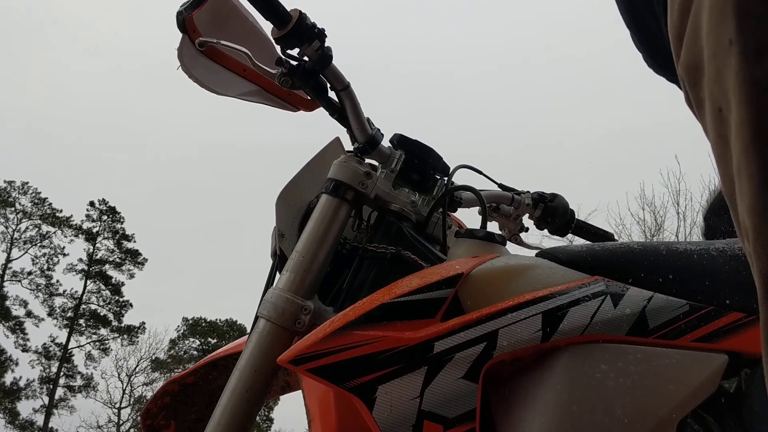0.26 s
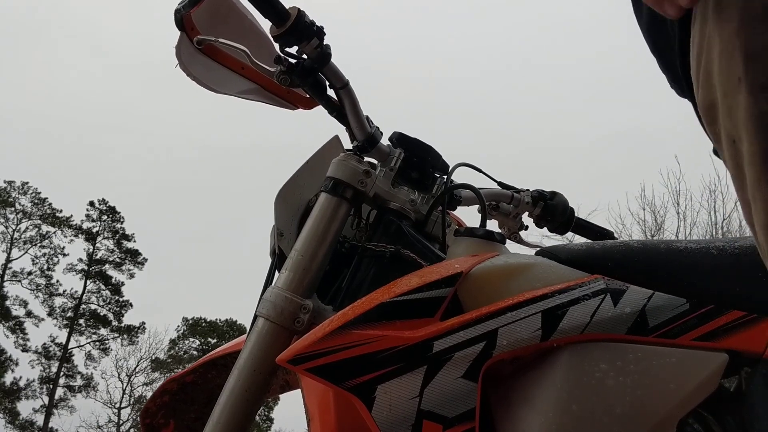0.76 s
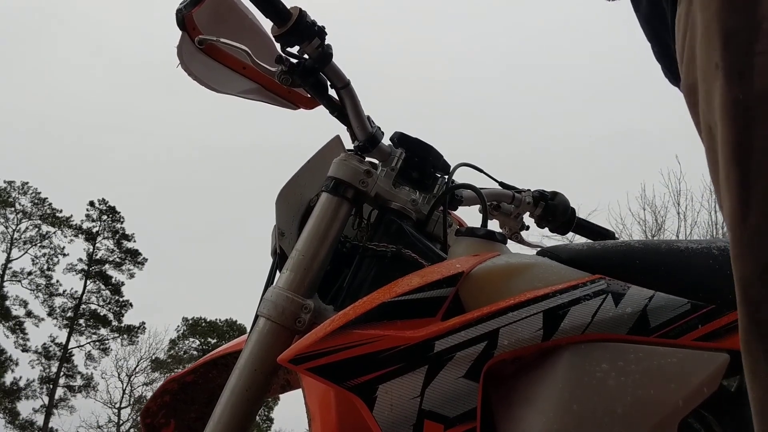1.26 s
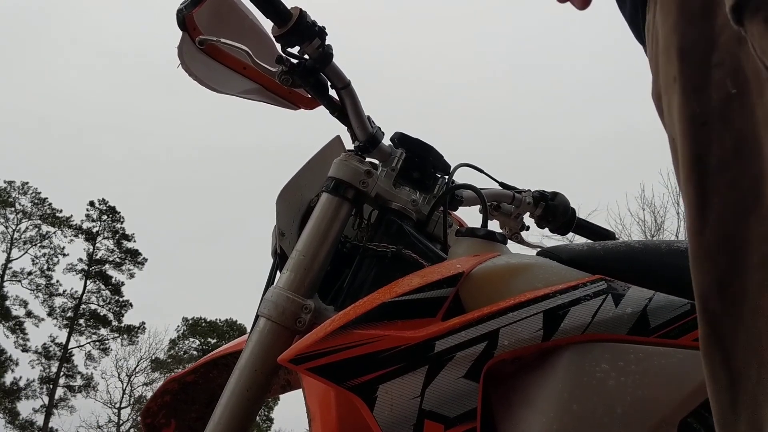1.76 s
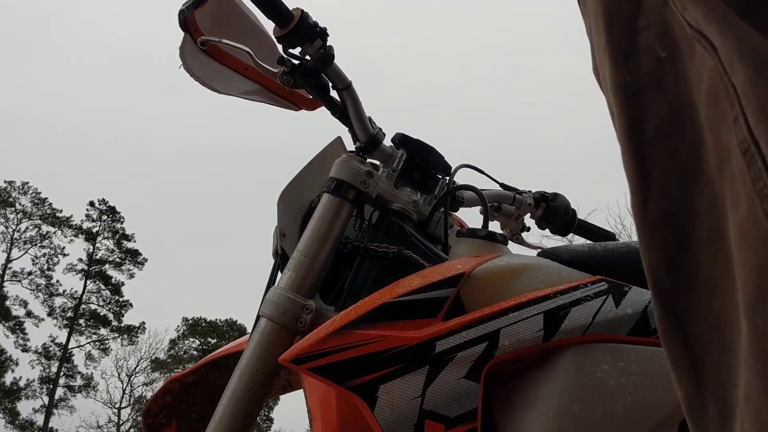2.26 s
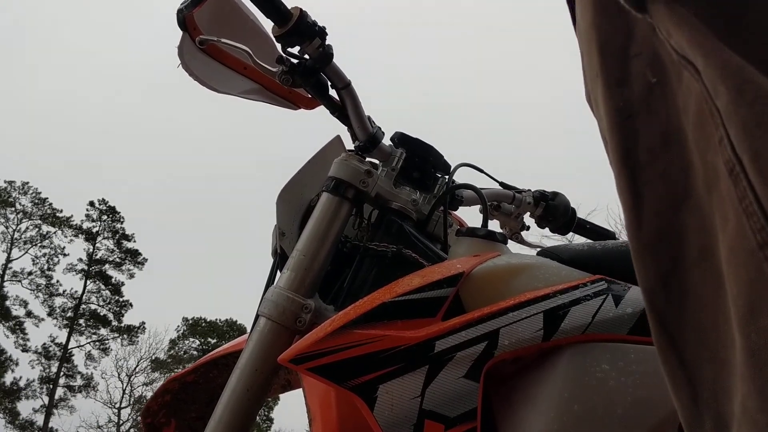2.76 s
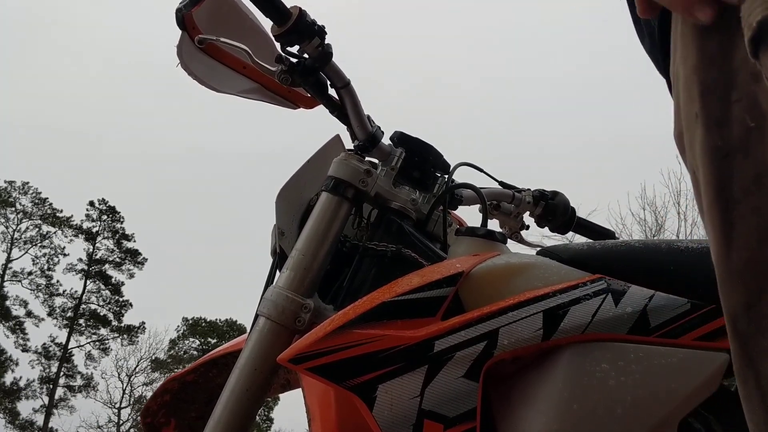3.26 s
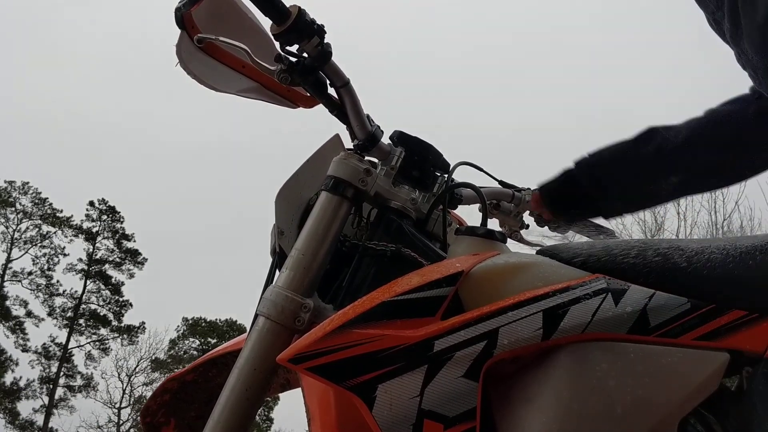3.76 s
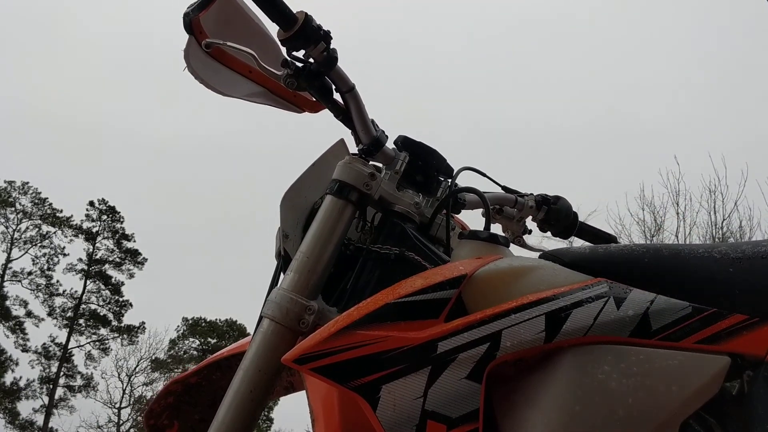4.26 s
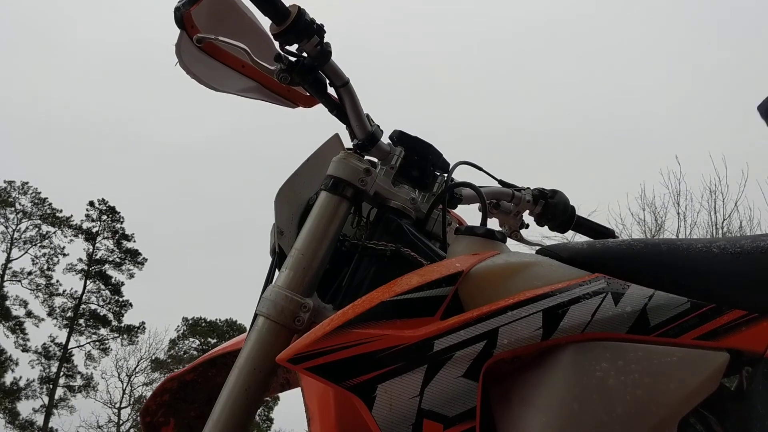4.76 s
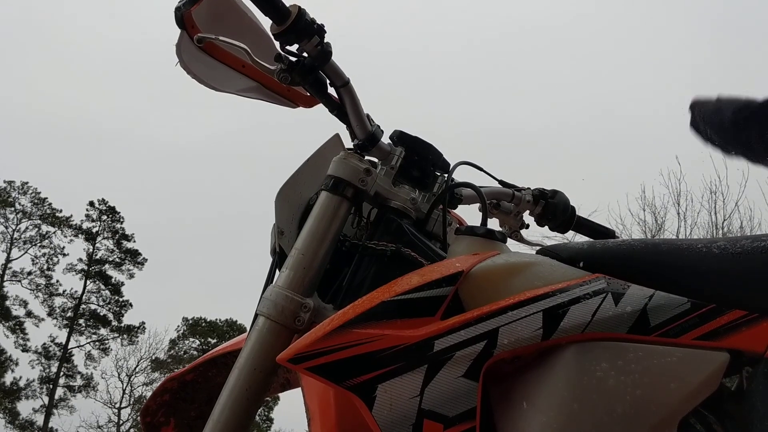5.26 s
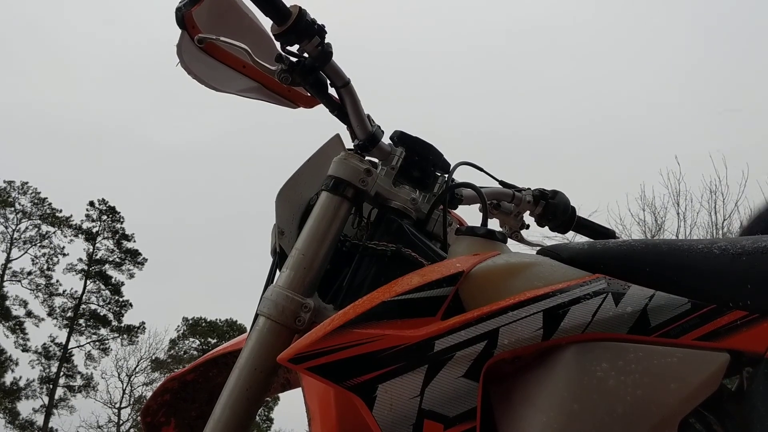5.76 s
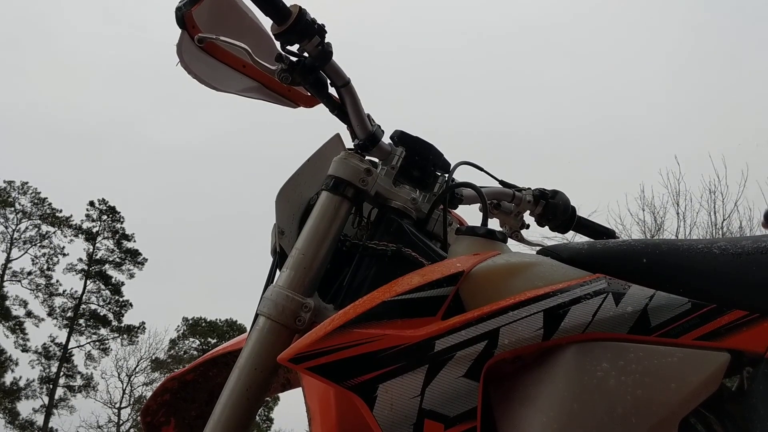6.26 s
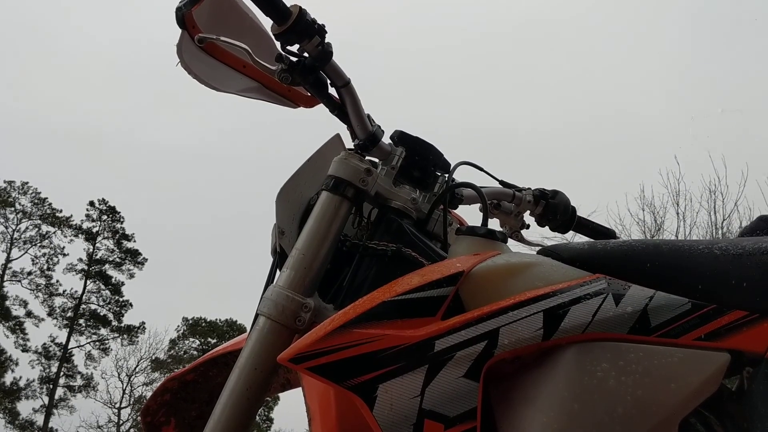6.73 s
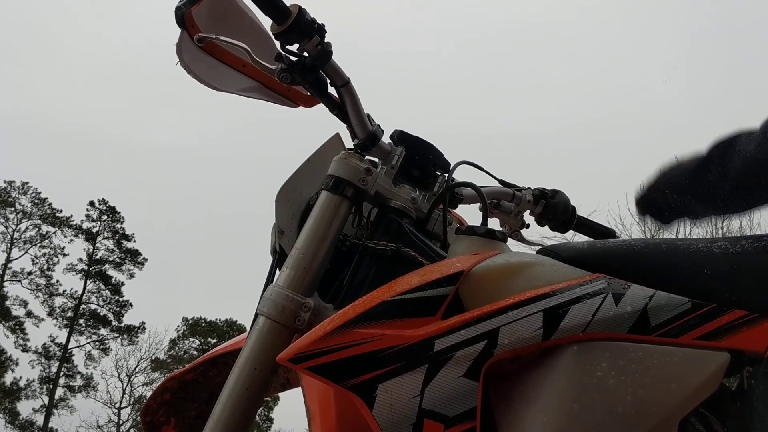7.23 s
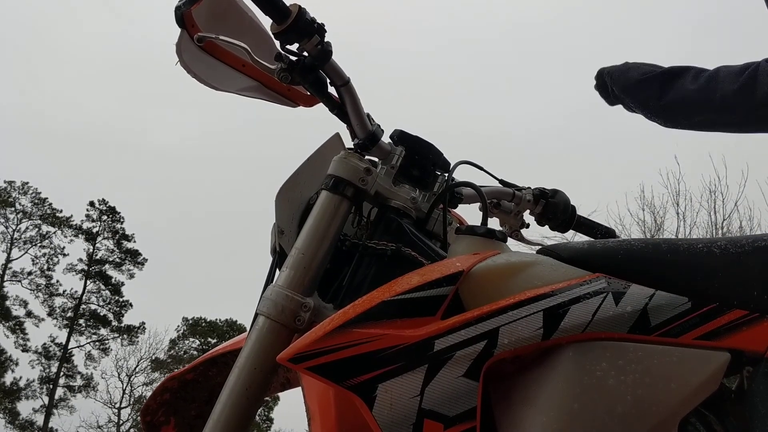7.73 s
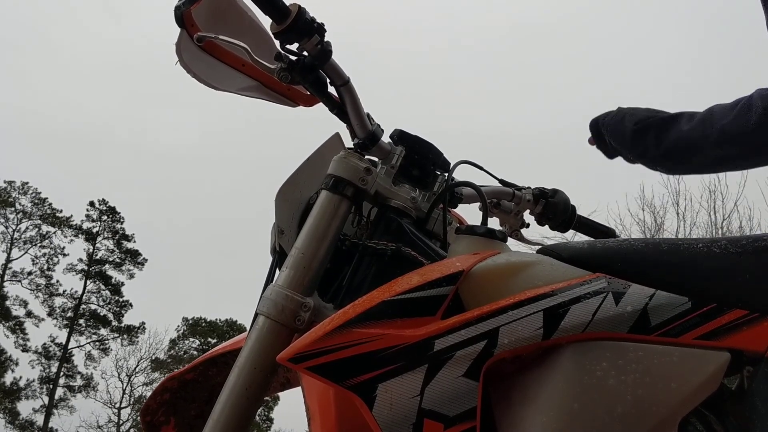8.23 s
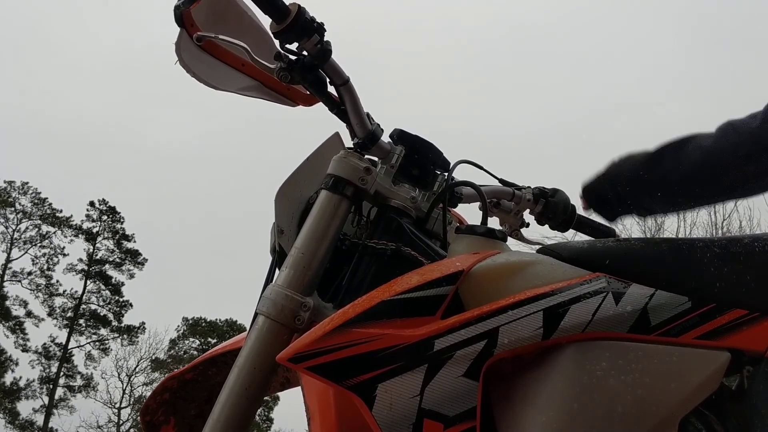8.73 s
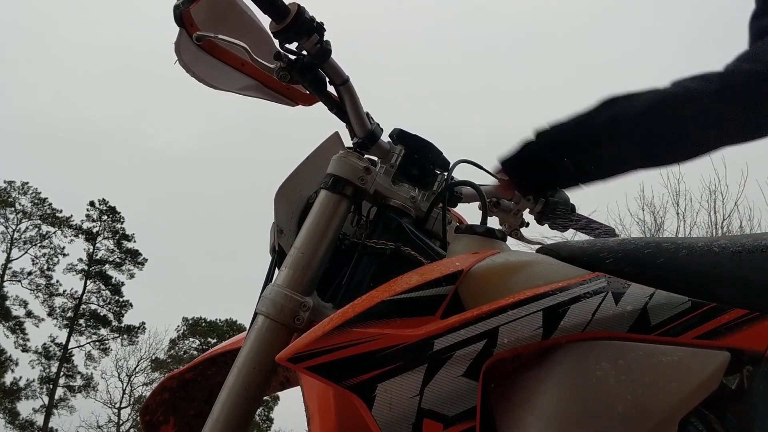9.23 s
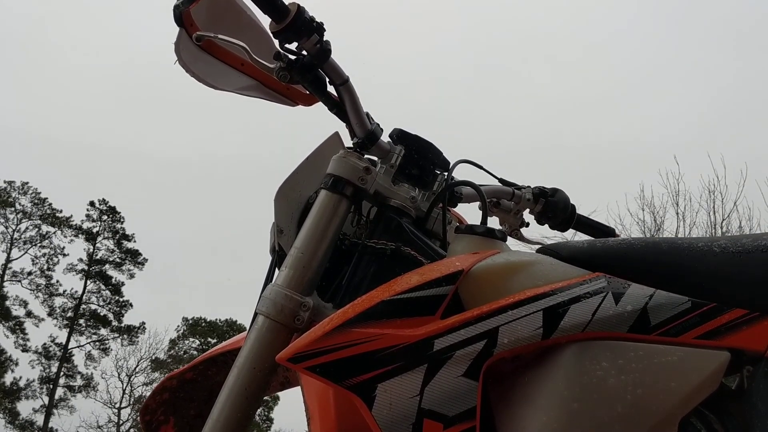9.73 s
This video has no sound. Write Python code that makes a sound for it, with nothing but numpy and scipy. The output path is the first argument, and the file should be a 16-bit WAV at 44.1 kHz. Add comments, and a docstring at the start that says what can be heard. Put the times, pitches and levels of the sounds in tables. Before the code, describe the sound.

Close outdoors, a two-stroke dirt bike cranks slowly without catching. Dry, hollow chugs come about four a second, each a crack and bark over a low boom with a breathy puff. After three and a half seconds it falters into hissing spits and a pause, then chugs resume harder and brighter. Near nine seconds it fails again, sputtering weakly. Faint yard echo, quiet air.

```python
"""Two-stroke dirt bike turning over slowly outdoors

Each chug dumps the cylinder into the exhaust: noise blasts give a crack and a bark, swinging tones a low boom
and a drone, slower noise a trailing puff. Twice the chugging falters and gas spits out in sputtering hisses.
Whistles and ticks come from the engine, and dull low bumps fall between the chugs; the yard gives a faint echo."""
import sys
import numpy as np
from scipy import signal
from scipy.io import wavfile
from scipy.ndimage import uniform_filter1d

SR = 44100
rng = np.random.default_rng(int(sys.argv[2]) if len(sys.argv) > 2 else 0)


def digitize_waveform(pressure):
    """Quantize a signal to 16-bit integers and store it at the path in sys.argv[1].

    Rows of a 2-D input are taken as channels; values are limited to [-1, 1].
    """
    field = np.atleast_2d(pressure).T
    bounded = np.clip(field, -1, 1)
    quanta = np.round(bounded * 32767).astype(np.int16)
    wavfile.write(sys.argv[1], SR, quanta)


N = 440559

# exhaust resonances, lift scaled by each user's depth: centre_hz, width_hz, lift_db
PIPE_MODES = [(172, 130, 5), (272, 52, 2), (315, 26, 2.5), (356, 27, 0), (449, 21.4, 6.5), (589, 52, 3.5),
              (871, 20, 4.5), (950, 18, 1), (1151, 124, 3), (1480, 66, 0.5), (2086, 160, 5), (2680, 54, 1),
              (3060, 220, 3.5), (3600, 81, 3), (3930, 43, -1), (4770, 61, 2.5), (5030, 390, 4)]
# spectrum of the blowdown's sharp edge: freq_hz, relative_density_db
CRACK_SPECTRUM = [(500, -12), (1200, -7.5), (2000, -12.5), (3200, -15.5), (4700, -16.5), (5700, -16),
                  (6900, -7.5), (7600, -8), (8600, -22.5), (10000, -34), (12000, -49.5), (15000, -43)]


def amp(db):
    """Decibels to gain."""
    return 10 ** (np.asarray(db) / 20)


def evened(x):
    """Scales to rms 1."""
    return x / np.sqrt(np.mean(x ** 2) + 1e-20)


def read(points, hz):
    """Reads a spectrum on a log-frequency axis."""
    point_hz, value = np.transpose(points)
    return np.interp(np.log(hz + 1), np.log(point_hz + 1), value)


def add(mix, start_s, sound):
    """Mixes a sound in at start_s."""
    part = mix[max(round(start_s * SR), 0):][:len(sound)]
    part += sound[:len(part)]


def ring(points, modes=(), depth=1, size=4096):
    """Minimum-phase impulse response of a spectrum with resonances raised on it; energy 1."""
    hz = abs(np.fft.fftfreq(size, 1 / SR))
    lifts = sum(lift_db / (1 + (2 * (hz - f) / width_hz) ** 2) for f, width_hz, lift_db in modes)
    log_gain = np.log(amp(read(points, hz) + depth * lifts))
    response = np.fft.ifft(np.exp(np.conj(signal.hilbert(log_gain)))).real
    return response / np.linalg.norm(response)


def through(x, response):
    """Filters x, keeping its length."""
    return signal.fftconvolve(x, response)[:len(x)]


def wobble(count, rate_hz):
    """Random curve: unit-variance Gaussian knots, rate_hz of them a second, joined by lines."""
    at = np.arange(count) * rate_hz / SR
    knots = rng.standard_normal(int(at[-1]) + 2)
    return np.interp(at, np.arange(len(knots)), knots)


def levelled(x, db, start_s, end_s):
    """Gives x the rms level db between two times."""
    window = x[int(start_s * SR):int(end_s * SR)]
    return x * amp(db) / np.sqrt(np.mean(window ** 2) + 1e-20)


def resonate(x, hz, width_hz):
    """A two-pole resonance, as the imaginary part of one complex pole."""
    r = np.exp(-np.pi * abs(width_hz) / SR)
    return signal.lfilter([1 - r], [1, -r * np.exp(2j * np.pi * hz / SR)], x).imag


def chugs():
    """Each blowdown swings the gas in the exhaust and rings its resonances."""
    # charge: gas swing in the pipe; force: how hard the port opens: start_s, charge_db, force_db
    chug_rows = [(0.1187, 1, 2), (0.3587, 1.5, -0.5), (0.6193, -1.5, -5.5), (0.9174, -1.5, -1.5),
                 (1.2252, 2.5, -3.5), (1.484, 0.5, -4), (1.7436, -0.5, -5.5), (1.9952, -1, -5.5),
                 (2.2649, -2.5, -5.5), (2.5313, -1.5, -4), (2.8317, -2, -2), (3.083, -1.5, -6),
                 (3.3466, 1.5, -3.5), (3.671, -19, -15), (3.996, -10, -3), (4.893, 4.5, 1),
                 (5.1394, 0.5, 4), (5.3722, -0.5, 4.5), (5.602, 0.5, 2.5), (5.8412, 1, 2), (6.0835, -2, 3),
                 (6.3209, 0, 2), (6.5649, -2.5, 2.5), (6.799, 0.5, 3), (7.0505, 2, 3), (7.3205, 1, 3.5),
                 (7.604, -0.5, 4), (7.894, -3, 0), (8.149, -3.5, 1.5), (8.355, -2.5, 1),
                 (8.5614, -7.5, 3.5), (8.824, -5, 3.5), (9.242, -12.5, -9), (9.552, -19, -8),
                 (9.966, -10, -11.5)]
    # levels at 0 dB charge and force
    boom_db, drone_db, puff_db, bark_db, crack_db = -30.5, -36, -35.5, -29.5, -31
    # dB per dB of charge (drone, puff) or force (crack: a hard opening is also brighter)
    drone_follow, puff_follow, crack_follow = 0.59, 1, 1.1
    head_s, middle_s, tail_s = .02, .04, .06
    out, t = np.zeros(N), np.arange(SR // 4) / SR
    for start_s, charge_db, force_db in chug_rows:
        chug = levelled(boom(t, force_db), boom_db + charge_db, 0, middle_s)
        chug += levelled(drone(t), drone_db + drone_follow * charge_db, 0, middle_s)
        chug += levelled(bark(t), bark_db + force_db, 0, head_s)
        chug += levelled(crack(t, force_db), crack_db + crack_follow * force_db, 0, head_s)
        chug += levelled(puff(t), puff_db + puff_follow * charge_db, head_s, tail_s)
        add(out, start_s, chug)
    return out


def blast(t, hold_s, decay_s, shock, ragged_db):
    """A pressure step as the port opens, then ragged turbulence that holds briefly and dies."""
    gas = rng.standard_normal(len(t)) * amp(ragged_db * wobble(len(t), 708))
    gas *= np.exp(-np.maximum(t - hold_s, 0) / decay_s)
    gas[0] -= shock
    return gas


def bark(t, round_trip_s=.0083, return_db=-1):
    """The pressure wave runs down the chamber and comes back as a second blow."""
    # relative spectrum: freq_hz, density_db
    bark_spectrum = [(100, -44.5), (220, -25), (320, -8.5), (450, -2.5), (620, 1.5), (850, -5.5),
                     (1200, -7), (1700, -12), (2600, -14), (5000, -53.5)]
    blows = blast(t, hold_s=0.0048, decay_s=0.0031, shock=3.6, ragged_db=3.5)
    second = blast(t, hold_s=0.0016, decay_s=0.0094, shock=12.2, ragged_db=4.5)
    add(blows, round_trip_s, amp(return_db) * second)
    return through(blows, ring(bark_spectrum, PIPE_MODES, depth=1.42))


def crack(t, force_db, sizzle_db=-23):
    """The blowdown's sharp edge, shorter the harder it comes, over a faint longer sizzle."""
    hold_s, decay_s, halving_db = 0.0027, 0.0069, 14  # times at 0 dB force; halved per halving_db
    stretch = 2 ** (-force_db / halving_db)
    sizzle = amp(sizzle_db) * blast(t, hold_s=0.0086, decay_s=0.049, shock=0, ragged_db=5.5)
    edge = blast(t, hold_s * stretch, decay_s * stretch, shock=6.5, ragged_db=3)
    chance_modes = lumps(low_hz=1190, high_hz=7490, lift_db=5, width_hz=440)
    return through(sizzle + edge, ring(CRACK_SPECTRUM, [*PIPE_MODES, *chance_modes]))


def lumps(low_hz, high_hz, lift_db, width_hz, count=12):
    """Chance resonances and dips, up to lift_db: no two cracks have quite the same colour."""
    draws = rng.uniform((low_hz, -1), (high_hz, 1), (count, 2))
    return [(hz, width_hz, lift_db * share) for hz, share in draws]


def boom(t, force_db, unsteady=0.31, detune=.035):
    """The gas in the pipe swings briefly, higher after a hard opening, then rings on unsteadily."""
    base_hz, hz_per_db = 79.5, .5
    peak_s, width_s, ring_decay_s = 0.014, 0.015, 0.054
    hz = (base_hz + hz_per_db * force_db) * rng.normal(1, detune)
    swell = np.exp(-((t - peak_s) / width_s) ** 2)
    swell += unsteady * np.exp(-t / ring_decay_s) * wobble(len(t), 65.2)
    return swell * np.sin(2 * np.pi * hz * t - .4)


def drone(t, attack_s=0.0074, detune=.024):
    """The higher gas swings, hollow decaying tones, never tuned quite the same."""
    # pitch_hz, relative_level_db, t60_s
    overtones = [(125.5, -0.5, 0.26), (165.5, 0.5, 0.17), (192.3, 0.5, 0.22), (249.5, -1.5, .18),
                 (310.5, -5.5, 0.14)]
    tones = np.zeros(len(t))
    for hz, db, t60_s in overtones:
        cycles = hz * rng.normal(1, detune) * t + rng.random()
        tones += amp(db - 60 * t / t60_s) * np.sin(2 * np.pi * cycles)
    return np.minimum(t / attack_s, 1) * tones


def puff(t, attack_s=.023, hold_s=0.028, decay_s=0.024, ragged_db=4.0):
    """The rest of the charge follows while the port stands open."""
    # relative spectrum: freq_hz, density_db
    puff_spectrum = [(120, -34.5), (250, -6.5), (350, -10), (600, -10), (1100, -11.5), (2000, -21),
                     (3200, -29), (5500, -31.5), (6900, -21.5), (7500, -22), (8600, -36), (10500, -49.5),
                     (12500, -56), (15000, -52)]
    flow = np.minimum(t / attack_s, 1) ** 2 * np.exp(-np.maximum(t - hold_s, 0) / decay_s)
    gas = flow * rng.standard_normal(len(t)) * amp(ragged_db * wobble(len(t), 299.6))
    return through(gas, ring(puff_spectrum, PIPE_MODES, depth=0.69))


def spits():
    """Gas squeezed out under compression: a broad rush with a sharp hiss on top."""
    # start_s, length_s, shut_s, rush_db, hiss_start_db, hiss_end_db
    spit_rows = [(2.648, 0.078, .018, -48.5, -63, -62), (3.55, 0.04, .01, -47, -66, -59),
                 (3.67, 0.14, 0.0061, -31.5, -37, -26), (3.993, 0.023, 0.0066, -33, -28, -27.5),
                 (4.02, .09, .016, -35, -32.5, -30.5), (4.277, 0.081, 0.019, -41, -53, -42),
                 (4.341, .078, .005, -33.5, -24.5, -29.5), (8.843, .098, 0.016, -36.5, -31.5, -35.5),
                 (9.221, 0.04, 0.01, -31.5, -21.5, -29), (9.552, 0.083, 0.019, -35, -23.5, -36),
                 (9.826, 0.13, 0.014, -47, -49, -57), (9.964, 0.021, .006, -29, -29.5, -23)]
    # relative spectra: freq_hz, density_db
    rush_spectrum = [(100, -7), (300, -1.5), (600, -2.5), (1100, 2), (2000, 1.5), (3000, 1.5), (4300, 0.5),
                     (5600, -4), (7000, -9.5), (12000, -39)]
    hiss_spectrum = [(2000, -53), (4000, -15), (4750, -9), (5300, -11), (5900, -5), (6400, -7), (7000, 2),
                     (7550, 0.5), (8300, -13), (10000, -27), (12000, -38.5), (15000, -33.5)]
    # a jet at strong_db opens in open_s; a weaker one takes longer in proportion
    open_s, strong_db = 0.0024, -29.5
    rush_sag_db = -4.5  # as the pressure behind a spit runs out
    rush, hiss = np.zeros(N), np.zeros(N)
    for start_s, length_s, shut_s, rush_db, first_db, last_db in spit_rows:
        rise_s = open_s * amp(strong_db - rush_db)
        low, high = jet(length_s, rise_s, shut_s, sputter_db=1.5, sputter_hz=372)
        spent = np.minimum(np.arange(len(low)) / SR / length_s, 1)
        add(rush, start_s, amp(rush_db + rush_sag_db * spent) * low)
        add(hiss, start_s, amp(first_db + (last_db - first_db) * spent) * high)
    gas = through(rush, ring(rush_spectrum, PIPE_MODES, depth=0.72))
    gas += through(hiss, ring(hiss_spectrum))
    return shifting(gas, patchy_db=2.6)


def jet(length_s, rise_s, fall_s, sputter_db, sputter_hz):
    """Two independent noises sharing one gate, broken up by a fast sputter."""
    t = np.arange(int((length_s + .06) * SR)) / SR
    gate = (1 - np.exp(-t / rise_s)) * np.exp(-np.maximum(t - length_s, 0) / fall_s)
    sputter = evened(amp(sputter_db * wobble(len(t), sputter_hz)))
    return gate * sputter * rng.standard_normal((2, len(t)))


def shifting(x, patchy_db):
    """The colour of a jet shifts in patches of some hundred Hz and some hundredths of a second."""
    z = signal.stft(x, nperseg=256)[2]
    patches = uniform_filter1d(rng.standard_normal(z.shape), size=4, axis=0)
    patches = evened(uniform_filter1d(patches, size=7, axis=1))
    return signal.istft(z * evened(amp(patchy_db * patches)), nperseg=256)[1][:len(x)]


def whistles(width_hz=340):
    """The jet sings for a moment in a narrow gap: noise through two equal resonances."""
    # middle_s, length_s, pitch_hz, level_db
    whistle_rows = [(2.686, 0.077, 2280, -58), (2.691, .1, 3450, -61), (3.582, 0.027, 1880, -45.5),
                    (3.703, 0.018, 2920, -34.5), (3.807, 0.017, 6640, -30.5), (9.571, .017, 4740, -30)]
    out = np.zeros(N)
    for middle_s, length_s, hz, db in whistle_rows:
        count = int(length_s * SR)
        tone = resonate(resonate(rng.standard_normal(count), hz, width_hz), hz, width_hz)
        add(out, middle_s - length_s / 2, amp(db) * evened(tone * np.hanning(count)))
    return out


def bumps():
    """Dull low pushes of noise between the chugs, with no resonances."""
    # start_s, length_s, level_db
    bump_rows = [(4.103, .1, -45), (4.208, 0.014, -36), (4.338, 0.036, -39), (4.763, 0.033, -45.5)]
    # relative spectrum: freq_hz, density_db
    bump_spectrum = [(25, -19), (55, -1), (90, 5), (160, -3.5), (300, -21), (600, -31), (2000, -60)]
    out, dull = np.zeros(N), ring(bump_spectrum)
    for start_s, length_s, db in bump_rows:
        noise = jet(length_s, rise_s=0.0014, fall_s=0.0039, sputter_db=-5.5, sputter_hz=100)[0]
        push = through(noise, dull)
        add(out, start_s, amp(db) * push * np.sqrt(length_s * SR) / np.linalg.norm(push))
    return out


def ticks(decay_s=0.0015, rattle_db=-42, rattle_per_s=14):
    """Single resonant ticks of the machine, and a light loose rattle of randomly timed knocks."""
    # start_s, pitch_hz, peak_db
    tick_rows = [(1.902, 2970, -44), (2.154, 2570, -45), (4.605, 445, -46), (4.638, 704, -43.5),
                 (4.735, 1290, -46), (9.858, 5740, -33), (9.901, 4070, -28)]
    out, t = np.zeros(N), np.arange(SR // 30) / SR
    for start_s, hz, db in tick_rows:
        tick = rng.standard_normal(len(t)) * np.exp(-t / decay_s)
        tick = through(resonate(tick, hz, hz / 3), ring([(100, 4), (7500, 0), (10000, -28)]))
        add(out, start_s, amp(db) * tick / abs(tick).max())
    knocks = (rng.random(N) < rattle_per_s / SR) * np.minimum(rng.exponential(1, N), 3)
    burst = np.exp(-t / decay_s) * rng.standard_normal(len(t)) / 10
    return out + amp(rattle_db) * through(through(knocks, ring(CRACK_SPECTRUM)), burst)


def yard(x, scatter_db=-22, echo_db=-1):
    """A few hard reflections and a thin tail scattered from ground and trees."""
    # colour of the scattered tail: freq_hz, relative_level_db
    scatter_spectrum = [(70, 1), (200, 3.5), (600, -10.5), (2000, -1.5), (4500, -1), (7400, -13),
                        (14000, 8)]
    # distinct reflections, level before echo_db: delay_s, level_db
    echo_rows = [(0.037, -22.5), (.063, -32), (0.098, -32), (0.12, -34.5), (0.157, -42)]
    t60_s, build_s, taps_per_s = .7, 0.044, 3000
    t = np.arange(SR * 3 // 4) / SR
    taps = rng.choice([-1., 1.], len(t)) * (rng.random(len(t)) < taps_per_s / SR)
    taps *= amp(-60 * t / t60_s) * np.minimum(t / build_s, 1) ** 2
    response = amp(scatter_db) * through(taps / np.linalg.norm(taps), ring(scatter_spectrum))
    for delay_s, db in echo_rows:
        add(response, delay_s, amp([db + echo_db]))
    return through(x, response)


def air():
    """Quiet outdoor background: shaped noise with an unsteady low rumble."""
    # relative spectrum: freq_hz, density_db
    air_spectrum = [(12, -39), (20, 1.5), (74, 4), (228, -12.5), (434, -12.5), (1030, -18.5), (1150, -20.5),
                    (2320, -24.5), (3630, -29), (5380, -29.5), (7310, -23.5), (9140, -39.5), (11400, -41.5),
                    (14700, -41), (16000, -65)]
    rumble_spectrum = [(20, -26), (45, 18.0), (75, -2.5), (130, -6.5), (400, -63), (2000, -75)]
    wash = through(rng.standard_normal(N), ring(air_spectrum))
    wash *= amp(-56.73 + 2.1 * wobble(N, 2.5))
    rumble = through(rng.standard_normal(N), ring(rumble_spectrum))
    return wash + rumble * amp(-66.0 + 6.2 * wobble(N, 6.9))


def scene(near_db=-4):
    """Chugs excite the yard in full; the smaller sounds nearby reach it near_db weaker."""
    exhaust = chugs()
    small_sounds = spits() + whistles() + ticks() + bumps()
    return (exhaust + small_sounds + yard(exhaust + amp(near_db) * small_sounds) + air())[None]


def record(dry):
    """The microphone loses the deepest bass; then the band limit."""
    low_cut_hz, edge_hz = 37, 16100
    thinned = signal.sosfilt(signal.butter(6, low_cut_hz, "highpass", fs=SR, output="sos"), dry)
    band = signal.firwin(511, edge_hz, window=("kaiser", 9), fs=SR)
    return signal.oaconvolve(thinned, band[None], "same")


dry = scene()
out = record(dry)
digitize_waveform(out)
```